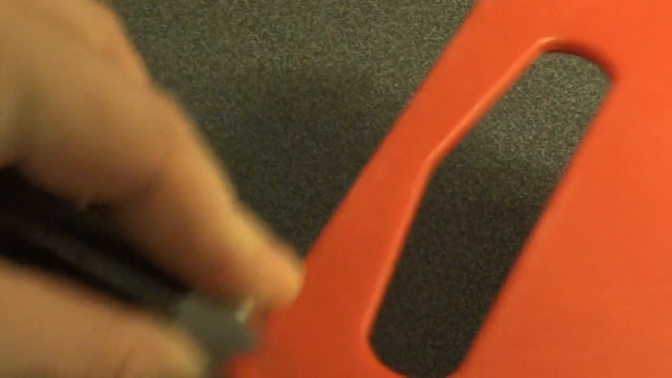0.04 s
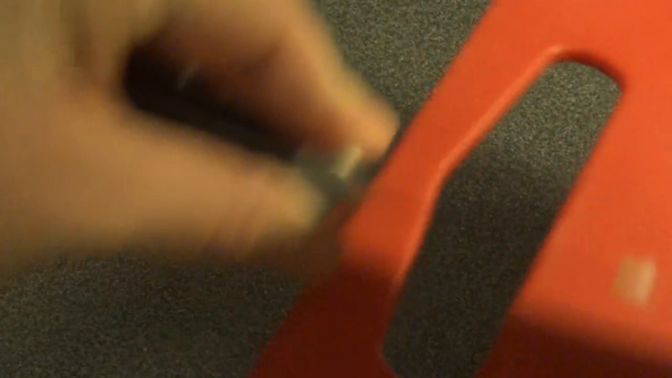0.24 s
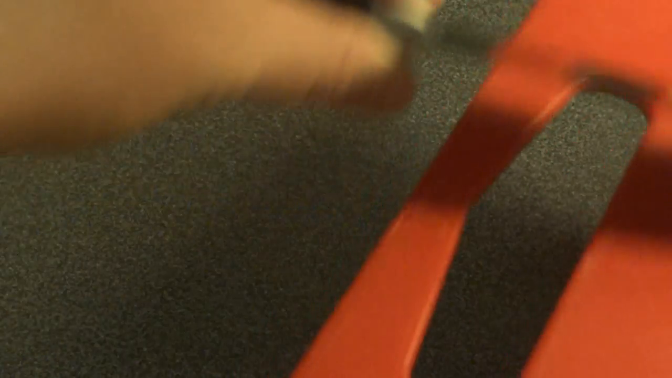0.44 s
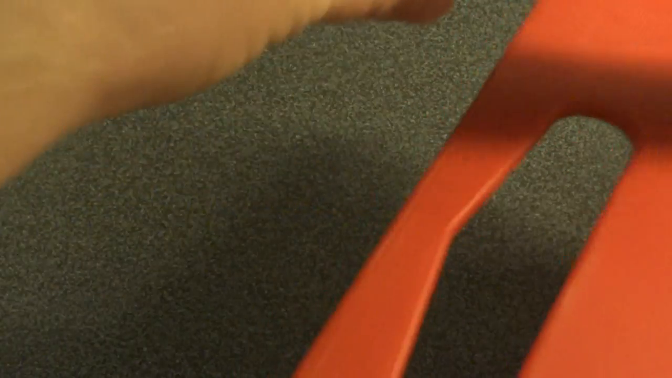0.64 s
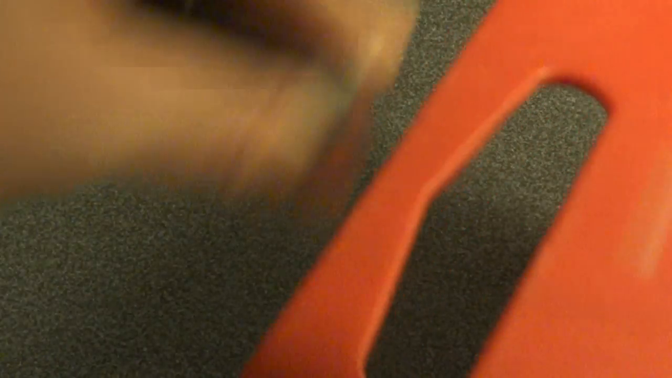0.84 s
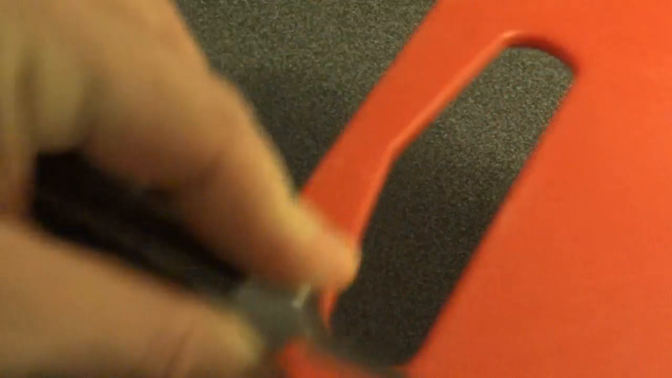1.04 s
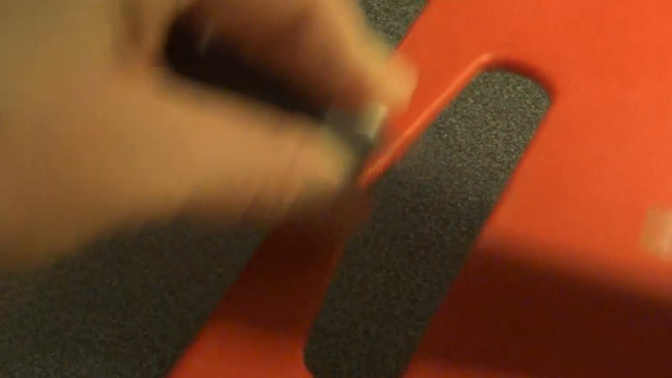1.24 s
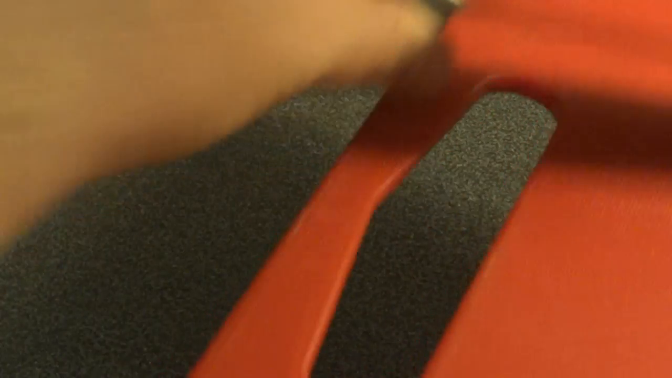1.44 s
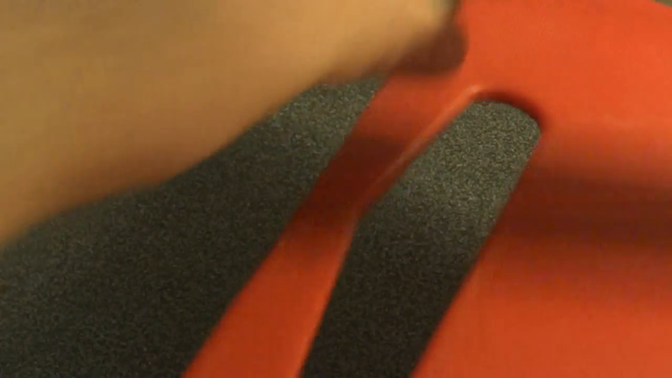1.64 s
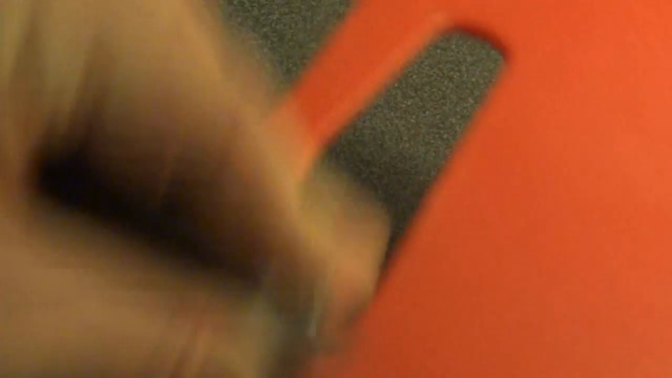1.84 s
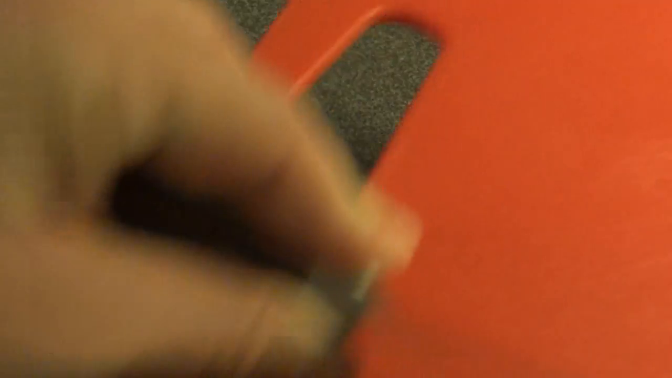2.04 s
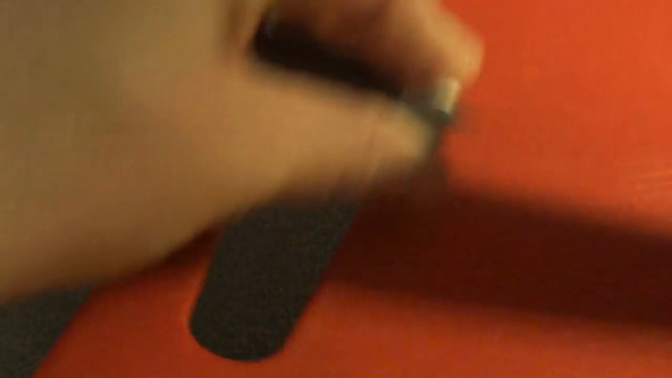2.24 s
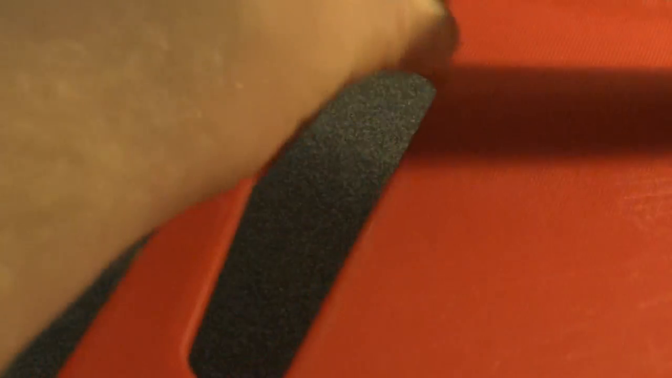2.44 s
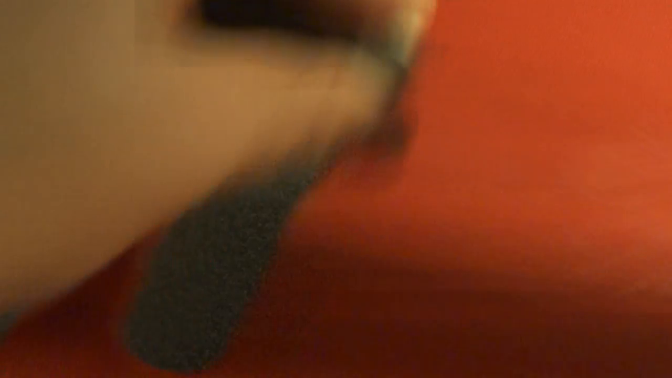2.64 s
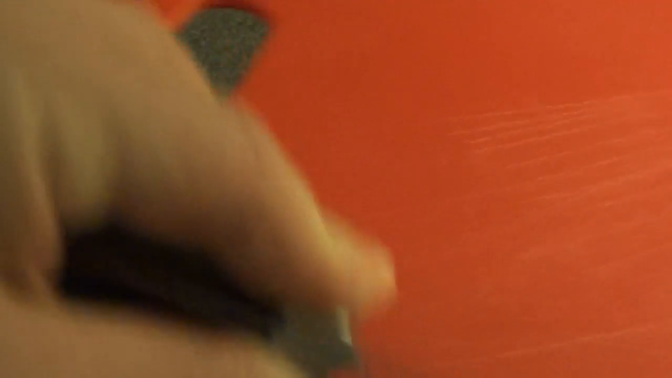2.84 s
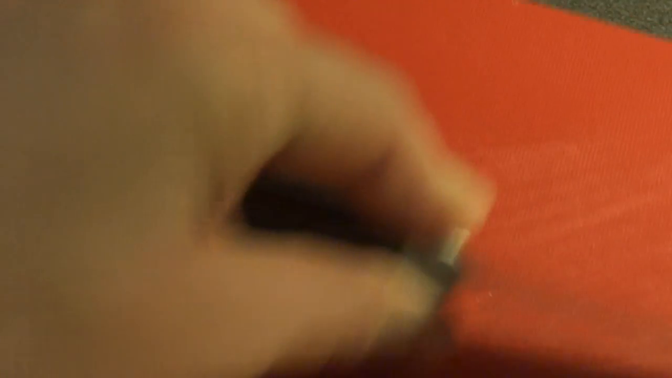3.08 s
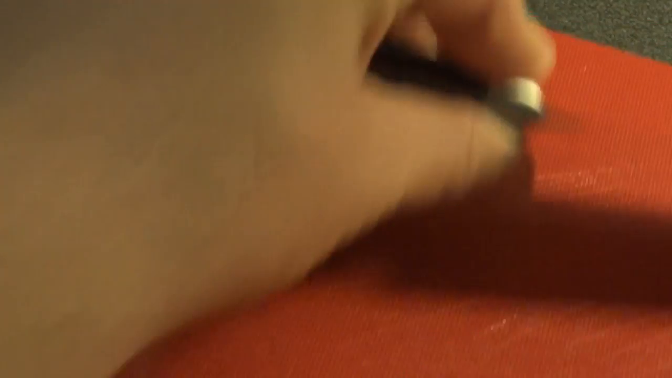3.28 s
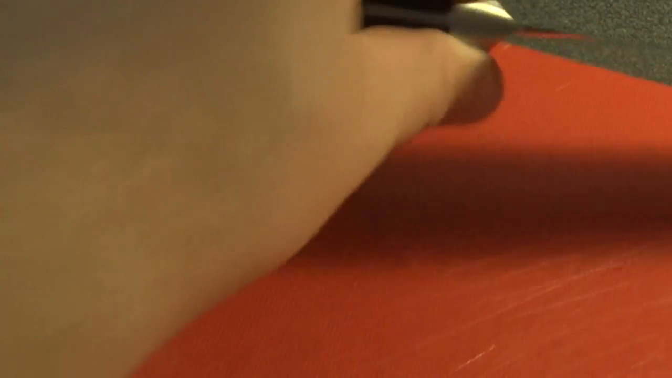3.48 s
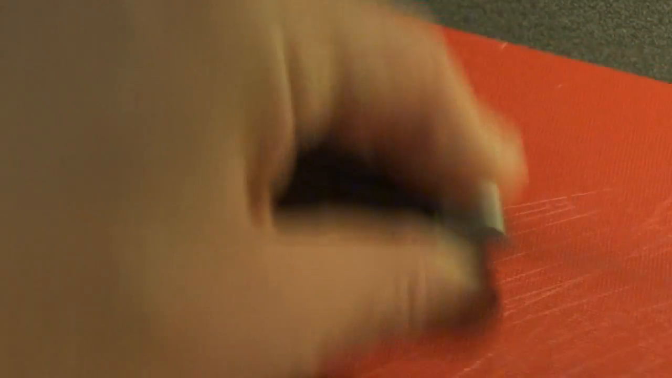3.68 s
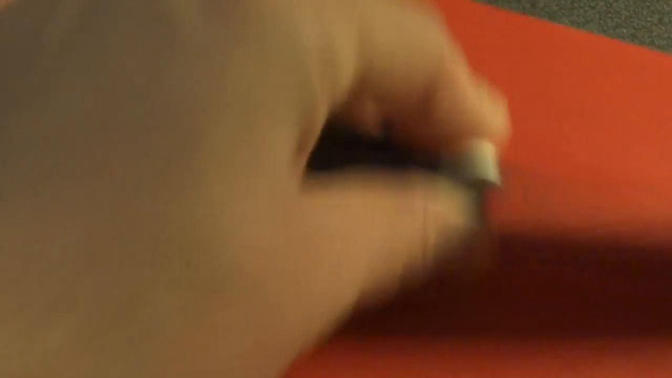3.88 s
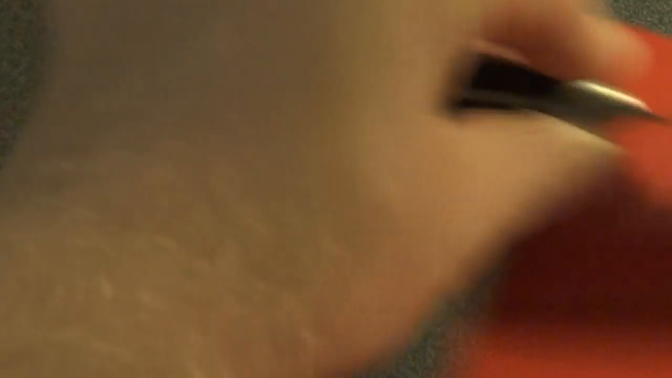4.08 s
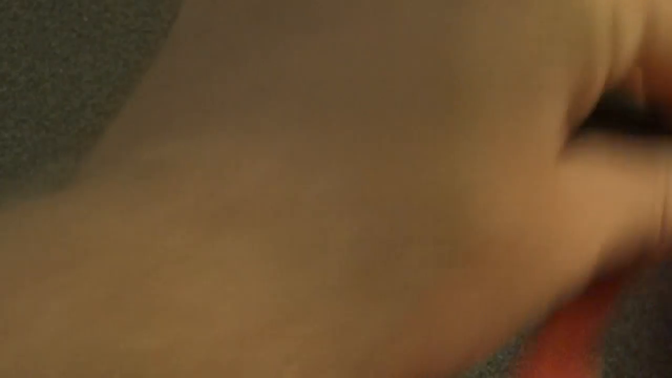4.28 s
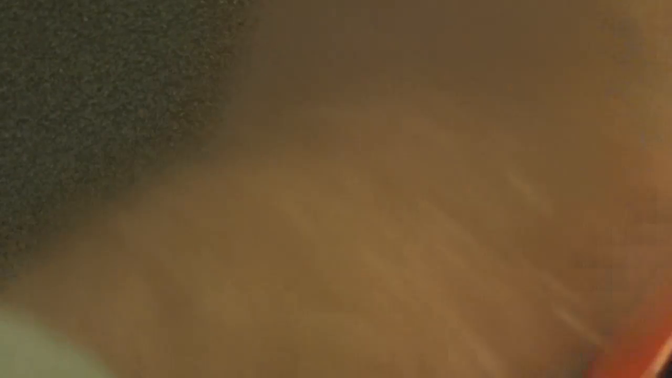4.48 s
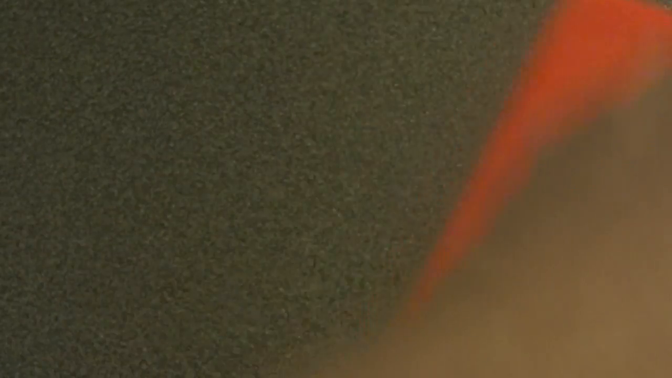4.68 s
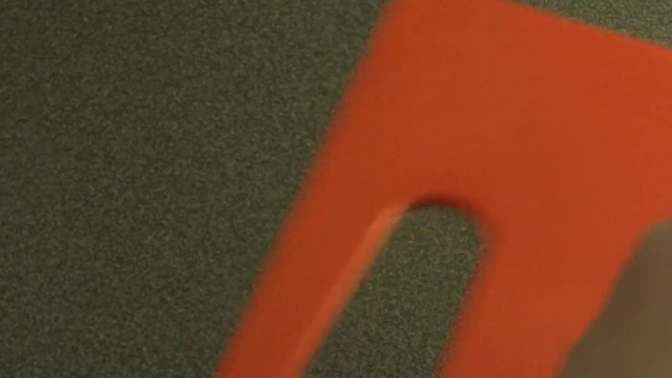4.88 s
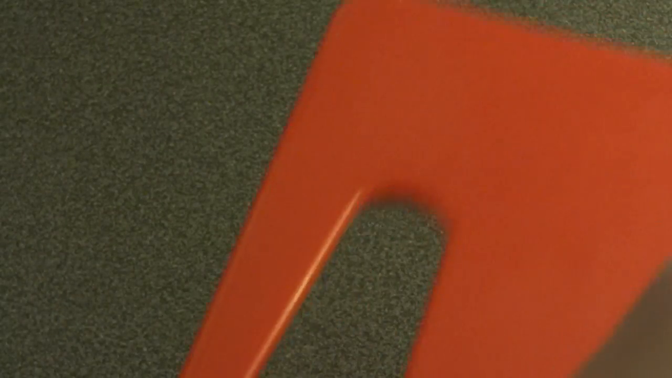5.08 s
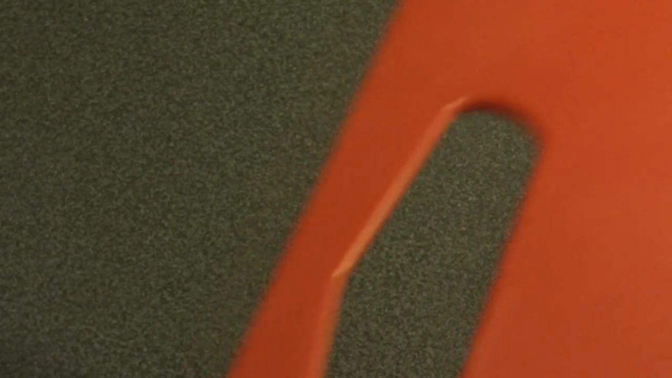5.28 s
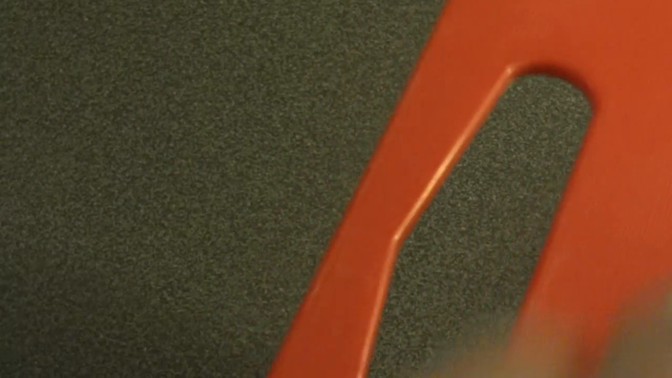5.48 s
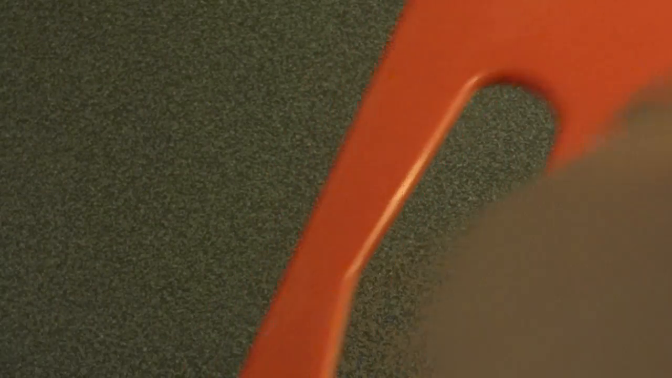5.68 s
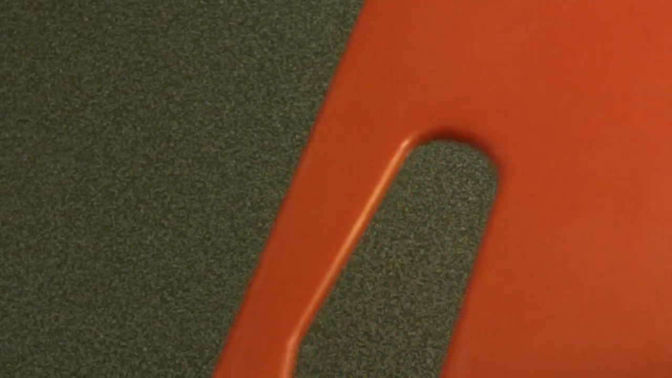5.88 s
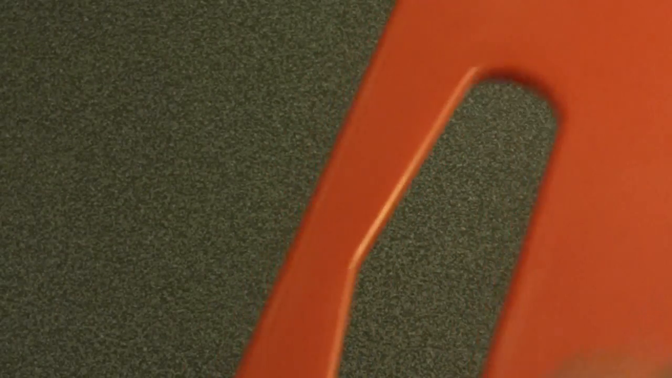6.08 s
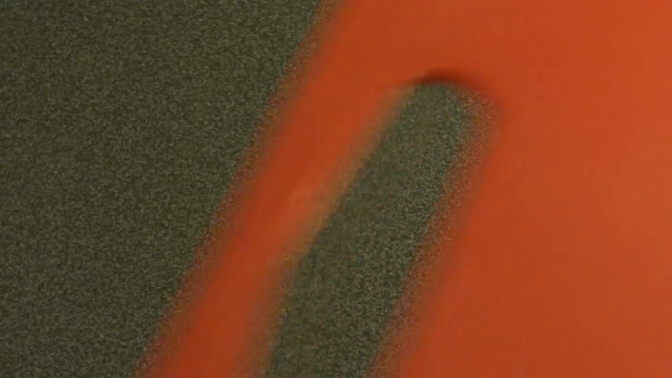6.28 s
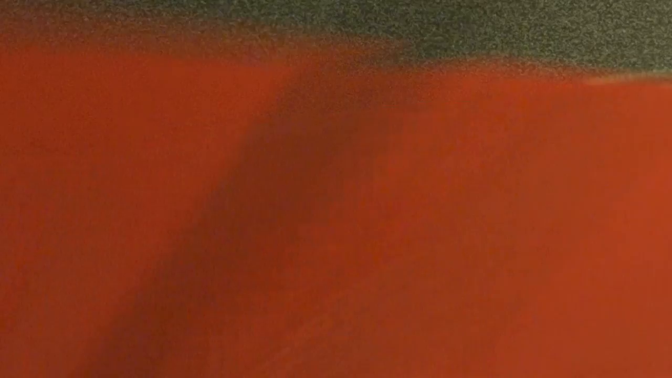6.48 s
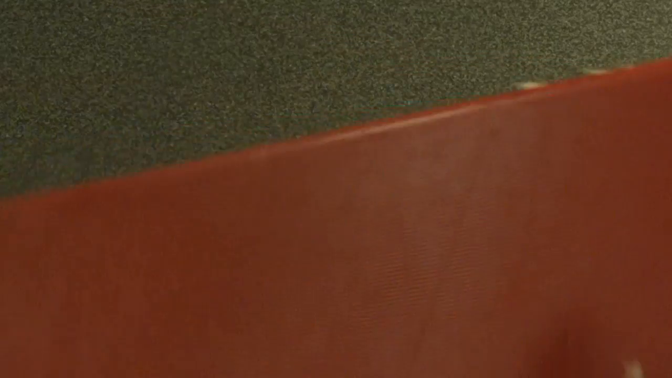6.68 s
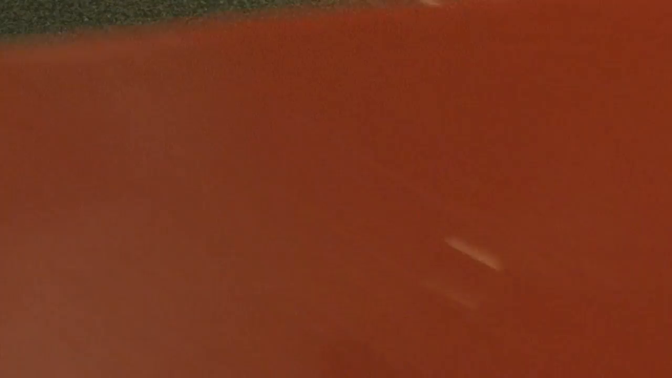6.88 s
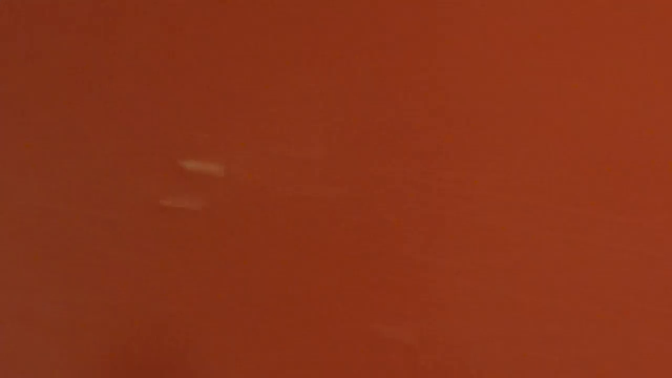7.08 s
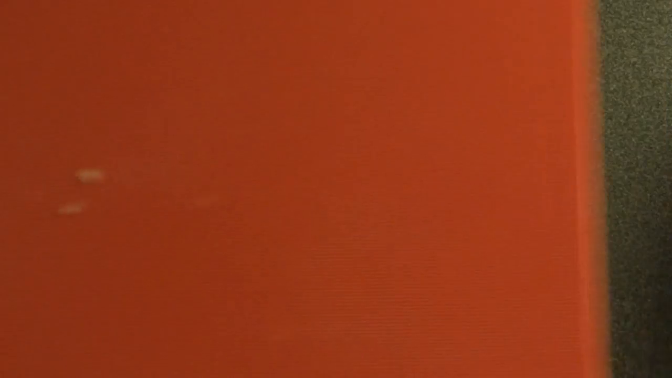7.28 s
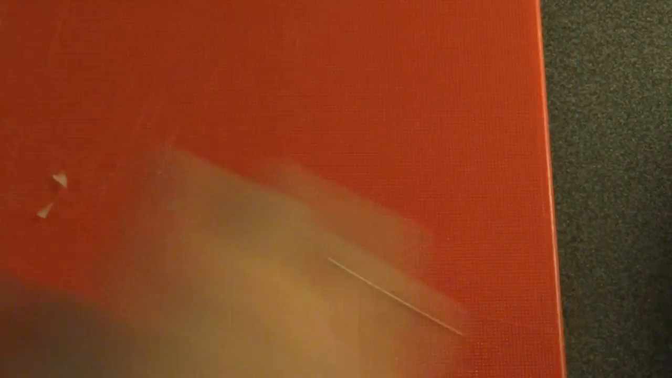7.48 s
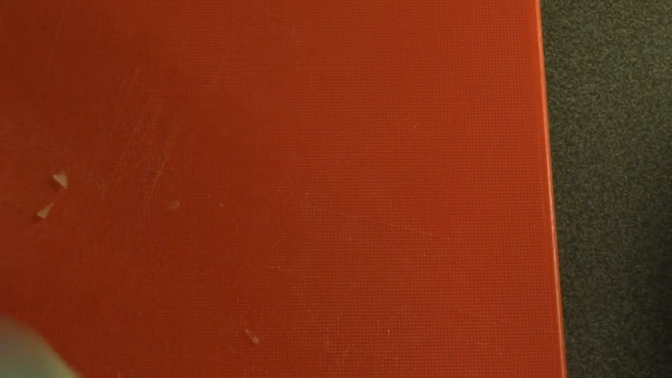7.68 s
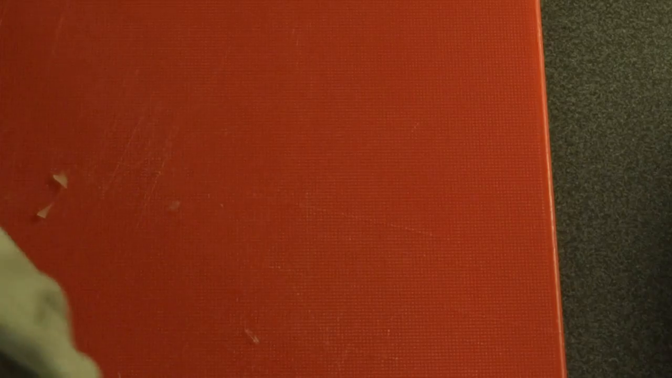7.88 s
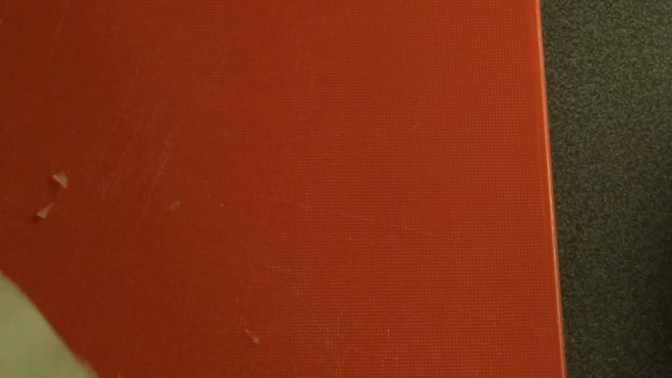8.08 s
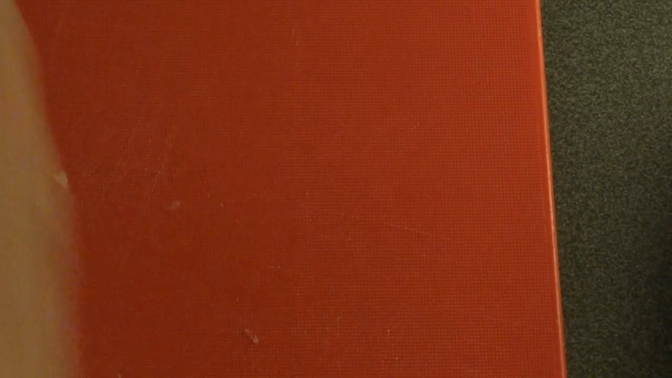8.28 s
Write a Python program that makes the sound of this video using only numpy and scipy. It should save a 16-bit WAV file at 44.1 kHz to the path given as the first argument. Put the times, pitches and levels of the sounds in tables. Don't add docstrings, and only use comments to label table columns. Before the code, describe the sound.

Close up in a hard-walled kitchen, a knife lands with a crack and rasps over a thin ridged plastic board about once a second, six times, the last two short. The blade is softly wiped, clinks and scrapes brightly on a steel rim, then the board slaps, slides and drops on the counter. A small stereo camera adds faint hiss.

```python
import sys
import numpy as np
from scipy import signal
from scipy.fft import rfft, irfft, next_fast_len
from scipy.io import wavfile
from scipy.ndimage import uniform_filter1d, map_coordinates

SR = 44100
rng = np.random.default_rng(int(sys.argv[2]) if len(sys.argv) > 2 else 0)


def convert_level_to_amplitude(level_db):
    exponent = np.asarray(level_db, float) / 20
    return 10 ** exponent


def master(y):
    cut = np.clip(np.atleast_2d(y).T, -1, 1)
    pcm = np.round(cut * 32767)
    wavfile.write(sys.argv[1], SR, pcm.astype(np.int16))


N = 367794


def unit(x):
    return x / np.sqrt(np.mean(x ** 2) + 1e-20)


def along(points, hz):
    f, v = np.transpose(points)
    return np.interp(np.log(hz + 1), np.log(f + 1), v)


def filtered(x, response):
    m = next_fast_len(x.shape[-1] + 8192)
    spectrum = rfft(x, m) * response(np.fft.rfftfreq(m, 1 / SR))
    return irfft(spectrum, m)[..., :x.shape[-1]]


def peak(f, hz, width):
    return 1j * f * width / (hz * hz - f * f + 1j * f * width + 1e-9)


def resonances(f, modes):
    return sum(convert_level_to_amplitude(db) * peak(f, hz, width) for hz, width, db in modes)


def causal(gain):
    m = 2 * len(gain) - 2
    cepstrum = irfft(np.log(gain + 1e-6), m)
    cepstrum[1:m // 2] *= 2
    cepstrum[m // 2 + 1:] = 0
    return np.exp(rfft(cepstrum))


def wobble(rate, part=slice(None)):
    knots = rng.standard_normal(int(N * rate / SR) + 4)
    return map_coordinates(knots, [np.arange(N)[part] * rate / SR], order=1)


def curves(tables, outside):
    out = np.full((len(tables[0][0]) - 1, N), float(outside))
    for s, *cols in map(np.transpose, tables):
        k = np.arange(int(s[0] * SR) + 1, min(int(s[-1] * SR) + 1, N))
        out[:, k] = np.maximum(out[:, k], [np.interp(k / SR, s, c) for c in cols])
    return out


def add(track, s, sound):
    part = track[..., round(s * SR):][..., :sound.shape[-1]]
    part += sound[..., :part.shape[-1]]


def add_hit(track, s, db, hit):
    add(track, s, convert_level_to_amplitude(db) * hit / np.abs(hit).max())


# (frequency [Hz], level [dB per Hz])
HISS_COLOUR = [(15, -53), (25, -30.5), (192, -9), (321, 0.5), (651, -4.5), (726, -1.5), (1430, -3),
               (1680, -6), (2270, -6.5), (2530, -7.5), (8140, -11.5), (15200, -13), (16500, -35.5)]
# (frequency [Hz], level [dB per Hz])
UNLIKE_COLOUR = [(15, -56), (25, -25.5), (259, -11.5), (349, -2), (746, -0.5), (952, -1), (1180, -1),
                 (11000, -23.5), (16500, -30)]
# (frequency [Hz], width [Hz], level [dB])
WHINE = [(4107, 14, -77), (8215, 70, -71), (10573, 30, -81), (12365, 110, -72)]
# (time [s], level [dB])
CREEP = [(0, -1), (4.3, -2), (5, -1.5), (6.5, 1), (8.34, .5)]


def floor():
    mid, side = (unit(filtered(rng.standard_normal(N), lambda f: convert_level_to_amplitude(along(colour, f))))
                 for colour in (HISS_COLOUR, UNLIKE_COLOUR))
    drift, flicker_db = np.cumsum(wobble(40)) / SR, 2.5 * wobble(60)
    whine = np.zeros(N)
    for hz, width, db in WHINE:
        turns = hz * np.arange(N) / SR + width / 2 * drift
        whine += convert_level_to_amplitude(db + 3 + flicker_db) * np.sin(2 * np.pi * turns)
    creep_db, = curves([CREEP], -9)
    return convert_level_to_amplitude(-59 + creep_db) * (mid + convert_level_to_amplitude(-2.0) * np.outer([1, -1], side)) + whine


def burst(t60):
    t = np.arange(SR // 8) / SR
    decay = convert_level_to_amplitude(-60 * t / max(t60, .003)) + 1.9 * convert_level_to_amplitude(-60 * t / min(0.03, 3 * t60))
    chatter = rng.standard_normal(len(t)) * decay
    chatter[0] = 12
    return chatter


# (frequency [Hz], level [dB per Hz])
KNOCK = [(60, -45), (150, -16), (500, -5), (1400, -1), (3000, -3), (4400, -4), (5500, -9), (7000, -17),
         (14000, -24), (16500, -40)]


def thuds(blows, modes=()):
    out = np.zeros(N)
    for s, db, centre_hz, thud_db, t60 in blows:
        def plate(f):
            thud = causal(convert_level_to_amplitude(along(KNOCK, f) + thud_db)) * (1 + 3 * peak(f, 440, 270))
            crack = peak(f, centre_hz, 2.2 * centre_hz) ** 2 + 0.17 * peak(f, 7100, 12000)
            return (thud + crack) * (1 + resonances(f, modes))
        add_hit(out, s, db, filtered(burst(t60), plate))
    return out


# (time [s], peak level [dB], thud level [dB])
LANDINGS = [
    (0.013, -10.5, -0.5),
    (1.0282, -11, 7),
    (1.926, -9, 29),
    (2.9073, -11, -4.5),
    (3.8014, -13, -7),
    (4.2605, -9.5, 22),
    (1.9287, -13.5, 2.5),
    (2.911, -15.5, 0),
]
# (frequency [Hz], width [Hz], level [dB])
LANDED = [(598, 150, 5), (950, 130, 2), (1380, 140, 4), (2540, 200, 2), (3100, 200, -3), (4420, 350, -3)]


def landings():
    edge_hz, edge_t60 = 850, 0.035
    return thuds([(s, db, edge_hz, thud_db, edge_t60) for s, db, thud_db in LANDINGS], LANDED)


def pressed(tables, grips, by_end_db=(0, 0), midway_db=(0, 0)):
    out = []
    for rows, (low_db, high_db, *motion) in zip(tables, grips):
        knots, db = np.transpose(rows)
        s = np.union1d(knots, np.linspace(knots[0], knots[-1], num=24))
        db = np.interp(s, knots, db)
        progress = (s - s[0]) / (s[-1] - s[0])
        fastest, slow_hz, fast_hz = motion or (.5, 0, 0)
        speed = np.sin(np.pi * progress ** (np.log(.5) / np.log(fastest)))
        low, high = np.outer(by_end_db, progress) + np.outer(midway_db, speed)
        ridge_hz = slow_hz + (fast_hz - slow_hz) * speed
        out.append(np.transpose([s, db + low_db + low, db, db + high_db + high, ridge_hz]))
    return out


def friction(tables, colour, modes, slips, scatter_db, judder_db, patchy_db, ridge_db=0):
    busy = slice(round(tables[0][0][0] * SR), round(tables[-1][-1][0] * SR) + SR // 2)
    control = curves(tables, -150)[:, busy]
    force = ((rng.random(N) < slips / SR) * rng.standard_normal(N))[busy]
    force *= convert_level_to_amplitude(scatter_db * wobble(300, busy))
    hz, t, z = signal.stft(force, SR, nperseg=512)
    clumps = uniform_filter1d(rng.standard_normal((257, N // 250)), size=8, axis=0)
    clumps = uniform_filter1d(clumps, size=4, axis=1)
    ridge_hz = np.interp(t, np.arange(len(force)) / SR, np.maximum(control[-1], 300))
    octaves = np.log2((hz[:, None] + 1) / ridge_hz)
    gain = convert_level_to_amplitude(patchy_db * unit(clumps)[:, :len(t)] + ridge_db * np.exp(-(octaves / .25) ** 2))
    force = signal.istft(z * gain, SR, nperseg=512)[1][:len(force)]

    def split(f):
        low = 1 / (1 + (f / 1200) ** 6)
        high = 1 - 1 / (1 + (f / 5000) ** 6)
        return convert_level_to_amplitude(along(colour, f)) * np.array([low, 1 - low - high, high])

    def body(f):
        return 1 + resonances(f, modes)

    bands = filtered(force, split)
    bands /= filtered(bands, body).std(axis=1, keepdims=True)
    judder = judder_db * np.array([wobble(45, busy) for _ in bands])
    out = np.zeros(N)
    out[busy] = filtered((convert_level_to_amplitude(control[:3] + judder) * bands).sum(axis=0), body)
    return out


# (time [s], pressure [dB])
STROKES = [
    [(.024, -38.5), (.14, -35), (.175, -27.5), (.346, -32.5), (.424, -30.5), (.554, -32), (.66, -61)],
    [(1.037, -32), (1.045, -44), (1.095, -36), (1.15, -28), (1.375, -32.5), (1.479, -35.5), (1.503, -51),
     (1.58, -62)],
    [(1.936, -38), (1.98, -35.5), (2.156, -27.5), (2.25, -28.5), (2.336, -30), (2.356, -33), (2.42, -31),
     (2.5, -66)],
    [(2.917, -30), (2.949, -43), (3.0, -31), (3.091, -28), (3.225, -27), (3.329, -31.5), (3.38, -37),
     (3.48, -69)],
    [(3.81, -31.5), (3.836, -37.5), (3.858, -29), (3.948, -34), (4.08, -57.5)],
    [(4.269, -35), (4.289, -34.5), (4.351, -33), (4.48, -75)],
]
# (board body [dB], edge hiss over the rasp [dB], share of the stroke at full speed,
# slow ridge rate [Hz], fast ridge rate [Hz])
GRIPS = [(3.5, -16, 0.34, 490, 560), (1, -13.5, 0.37, 420, 580), (0, -14.5, 0.56, 250, 690),
         (2.5, -17, 0.56, 460, 720), (-2, -12, 0.093, 370, 720), (-2.5, -10, 0.16, 1000, 720)]
# (gain as the edge rolls up [dB], gain at full speed [dB])
ROLL = [(-5, 6), (10.5, -1)]
# (frequency [Hz], level [dB per Hz])
RASP_COLOUR = [(18, -89), (30, -56), (242, -16.5), (298, -10), (378, -11), (420, -5.5), (493, -7),
               (533, -8.5), (713, -4), (1750, -19), (1890, -20.5), (5300, -26), (13700, -27.5),
               (15200, -32.5), (16500, -73)]
# (frequency [Hz], width [Hz], level over the smooth colour [dB])
BOARD = [(319, 22, 9), (418, 26, 12), (460, 18, 10), (527, 18, 13), (553, 20, 10), (631, 30, 8),
         (721, 28, 9), (752, 22, 8), (825, 20, 7), (940, 24, 7), (1005, 26, 5), (1240, 40, 3),
         (1474, 22, 6), (1900, 70, 0), (2540, 90, -3), (3080, 200, -9)]


def rasps():
    return friction(pressed(STROKES, GRIPS, *np.transpose(ROLL)), RASP_COLOUR, BOARD,
                    slips=5500, scatter_db=2.2, judder_db=1, patchy_db=2.3, ridge_db=4)


def rings(rows, shape, rough):
    out, t = np.zeros(N), np.arange(-SR // 6, SR // 4) / SR
    for s, hz, db, swell, fade in rows:
        shake = [np.interp((t - t[0]) * 120, np.arange(60), knots) for knots in rng.standard_normal((2, 60))]
        level_db = db + 3 - 7 * np.where(t < 0, -t / swell, t / fade) ** shape + 6 * rough * shake[0]
        add(out, s + t[0], convert_level_to_amplitude(level_db) * np.sin(2 * np.pi * hz * (s + t) + rough * shake[1]))
    return out


# (time [s], frequency [Hz], rms
# level [dB], swell [s], fade [s])
SURGES = [(0.175, 419.7, -22.5, 0.017, 0.023), (0.192, 542, -27.5, 0.014, 0.068),
          (0.222, 727, -33, 0.017, 0.042), (0.232, 627, -17.5, 0.017, 0.022),
          (0.234, 942, -23, 0.012, 0.034), (0.237, 786, -27.5, 0.019, 0.021),
          (0.307, 412, -20.5, 0.017, 0.033), (0.424, 1003, -31.5, 0.09, 0.039),
          (0.429, 734, -38, 0.039, 0.047), (1.048, 419, -30, 0.019, 0.024),
          (1.135, 700, -29.5, 0.012, 0.0097), (1.182, 876, -36, 0.017, 0.022),
          (1.195, 561.5, -17.5, 0.017, 0.019), (1.21, 701, -29, 0.019, 0.09),
          (1.267, 1018, -30.5, 0.014, 0.017), (1.287, 529.6, -31, 0.014, 0.057),
          (1.302, 700, -29, 0.049, 0.017), (1.394, 652, -36, 0.09, 0.012),
          (2.227, 534.8, -15.5, 0.054, 0.046), (2.242, 830, -33.5, 0.09, 0.07),
          (2.255, 736, -24, 0.019, 0.014), (2.332, 732, -26, 0.017, 0.027),
          (2.407, 424.8, -21.5, 0.019, 0.014), (3.001, 626, -25, 0.022, 0.027),
          (3.066, 429, -25, 0.057, 0.09), (3.103, 611, -23, 0.014, 0.032), (3.138, 897, -26, 0.019, 0.021),
          (3.163, 425.8, -24, 0.019, 0.044), (3.165, 519, -31, 0.029, 0.09),
          (3.17, 685.4, -20.5, 0.037, 0.051), (3.198, 615, -22, 0.019, 0.022),
          (3.22, 917, -22.5, 0.039, 0.047), (3.265, 537, -22, 0.012, 0.016),
          (3.288, 990, -31.5, 0.09, 0.016), (3.861, 964, -30.5, 0.037, 0.017),
          (3.866, 686, -21.5, 0.014, 0.011), (3.884, 574, -29, 0.014, 0.044),
          (4.318, 729, -36, 0.052, 0.017),
          (.24, 1474, -36, .03, .03), (1.155, 585, -26, .045, .025), (2.11, 505, -28, .05, .03),
          (2.19, 735, -25, .04, .02), (2.2, 1007, -32, .03, .07), (2.26, 1250, -31, .03, .05),
          (3.215, 1244, -31, .06, .08), (3.24, 1324, -33, .02, .07), (3.27, 1640, -35, .05, .05),
          (3.24, 1071, -30, .03, .02)]


def surges():
    touching = curves(STROKES, -150)[0] > -150
    return rings(SURGES, shape=1.5, rough=.28) * touching


def spots(contacts):
    out = np.zeros(N)
    for s, db, centre_hz, width_hz, t60 in contacts:
        add_hit(out, s, db, filtered(burst(t60), lambda f: peak(f, centre_hz, width_hz) ** 2))
    return out


# (time [s], peak level [dB], centre [Hz], width [Hz], t60 [s])
TICKS = [(4.5659, -34, 2080, 2320, 0.47), (4.9701, -6.5, 8100, 14200, 0.007), (4.7, -41, 12000, 6980, .05),
         (6.243, -45, 1000, 700, .02), (6.793, -11.5, 3390, 6900, 0.0035),
         (7.378, -5.5, 4060, 5000, 0.0033), (7.378, -11.5, 1780, 1500, 0.0067),
         (.196, -31, 3970, 4960, .004), (.623, -29, 11000, 8000, .004), (.646, -29, 13500, 5000, .004),
         (1.344, -16, 3970, 5000, .004), (1.654, -48, 2000, 1490, .02), (2.645, -47, 2000, 3000, 0.022),
         (3.2046, -32, 6000, 7040, .004), (5.868, -15, 4270, 4000, .02), (6.588, -43, 4040, 3980, .004),
         (6.9792, -38, 9000, 9000, .004), (7.0435, -38, 9000, 10000, .004),
         (7.0889, -29, 12500, 5000, .004), (7.1084, -23, 12700, 4940, .02), (6.166, -36, 1170, 2470, 0.76),
         (7.09, -34, 3900, 500, .04), (7.706, -26, 6450, 2930, 0.011), (7.709, -38, 6700, 3080, 0.27),
         (7.705, -48, 10930, 2000, 0.022), (7.777, -27, 3900, 800, 0.008),
         (7.777, -28.5, 12470, 4060, 0.012), (7.778, -36, 930, 907, 0.028),
         (8.14, -40.5, 12000, 4000, 0.01), (8.294, -42, 1300, 600, .03), (8.294, -44, 3300, 1800, .01),
         (8.294, -47, 350, 300, .04), (8.318, -47, 1400, 700, .06)]


def ticks():
    return spots(TICKS)


# (time [s], frequency [Hz], rms level [dB],
# swell [s], fade [s])
SINGS = [(.76, 1474, -66, .03, .02), (.85, 1474, -60, .06, .025), (1.712, 1474, -50, .035, .06),
         (2.414, 1474, -42, .01, .025), (2.5, 1476, -45.5, .05, .06), (2.6, 1476, -48.5, .035, .04),
         (2.69, 1476, -63, .05, .06), (2.414, 3460, -49, .008, .03), (2.49, 3460, -53, .05, .05),
         (2.56, 3460, -60, .04, .025), (4.735, 9510, -57, .025, .025), (4.72, 11300, -54, .012, .012),
         (4.72, 14000, -56, .015, .015), (4.739, 12500, -53, .005, .01), (2.46, 422, -37, .03, .04),
         (3.39, 1474, -43, .02, .025), (3.4, 528, -38, .06, .07), (5.873, 3460, -29, .003, .018),
         (5.946, 3460, -27, .022, .018), (5.995, 3460, -42, .015, .012), (6.05, 3460, -44, .015, .035),
         (5.874, 5985, -32, .003, .015), (6.09, 5985, -47, .02, .03), (5.88, 1474, -38, .004, .02),
         (5.95, 422, -41, .03, .04)]


def singing():
    return rings(SINGS, shape=1.4, rough=.15)


# (time [s], peak level [dB], centre [Hz], length [s])
BUMPS = [
    (1.55, -64, 110, 0.038),
    (7.129, -56, 100, 0.042),
    (7.369, -31.5, 242, 0.021),
]


def bumps():
    out, t = np.zeros(N), np.arange(SR // 2) / SR
    for s, db, centre_hz, length in BUMPS:
        puff = unit(filtered(rng.standard_normal(len(t)), lambda f: peak(f, centre_hz, 1.2 * centre_hz) ** 2))
        add(out, s, convert_level_to_amplitude(db) * puff * t / length * np.exp(1 - t / length))
    return out


# (time [s], pressure [dB])
WIPES = [
    [(4.698, -63), (4.724, -55.5), (4.742, -59), (4.754, -72)],
    [(4.77, -84), (4.848, -83), (4.92, -96)],
    [(4.978, -36.5), (5.072, -54.5), (5.2, -68.5)],
    [(5.17, -71.5), (5.306, -59.5), (5.322, -49)],
    [(6.125, -75), (6.15, -63), (6.16, -72), (6.183, -52)],
]
# (low band over the middle [dB], high band over the middle [dB])
WIPE_GRIPS = [(-14, 4.5), (-17, 23), (-4.5, 0), (-13, 16), (1, 22)]
# (frequency [Hz], level [dB per Hz])
WIPE_COLOUR = [(59, -73), (100, -51), (418, -10), (983, -8.5), (5670, -9), (13000, -8.5), (15500, -12),
               (16500, -36)]
# (frequency [Hz], width [Hz], level [dB])
GRIPPED = [(441, 18, 13), (5930, 160, 2), (7700, 50, -8), (10640, 280, 3), (13000, 120, 7)]


def wipes():
    return friction(pressed(WIPES, WIPE_GRIPS), WIPE_COLOUR, GRIPPED,
                    slips=2500, scatter_db=0.0, judder_db=-2.0, patchy_db=-1.5)


def steel_blows(blows, modes, grind, swell):
    out, t = np.zeros(N), np.arange(SR // 2) / SR
    for s, db, slope_db, contact, damping in blows:
        push = np.exp(-np.abs(t / contact - 1.1) ** 3)
        ring = np.zeros(len(t))
        for hz, level, t60 in modes:
            level_db = level + slope_db * np.log2(hz / 6000) - 60 * damping * t / t60
            phase = 2 * np.pi * (hz * t + rng.random())
            shake = np.cumsum(rng.normal(0, .06, len(t)))
            ring += convert_level_to_amplitude(level_db) * np.sin(phase + shake)
        scratch = unit(filtered(rng.standard_normal(len(t)), lambda f: (
            peak(f, 10800, 5400) + 0.64 * peak(f, 4800, 5000) + 0.52 * peak(f, 1760, 1500))))
        hit = ring * (1 - np.exp(-t / contact) + swell * push) + grind * push ** 2 * scratch
        hit = filtered(hit, lambda f: (1j * f / (1j * f + 300)) ** 3)
        add_hit(out, s, db, hit)
    return out


# (time [s], peak level [dB], brightness [dB per octave], contact [s], damping of the grip)
GRAZES = [
    (4.736, -42, 0, .002, 1.2),
    (5.543, -34, 3, .005, 1.2),
    (6.185, -15, -1, .001, .7),
]
# (frequency [Hz], level [dB], t60 [s])
TIP = [(4683, -27, 0.03), (6191, -29, 0.11), (6961, -10, 0.06), (7827, -17, 0.041), (8710, -8, 0.042),
       (9512, -23, 0.094), (10450, -26, 0.12), (11250, -21, 0.065), (11430, -9, 0.045), (12270, -3, 0.041),
       (13310, -16, 0.062), (15160, -20, 0.075)]


def grazes():
    return steel_blows(GRAZES, TIP, grind=.3, swell=1)


# (time [s], peak level [dB], brightness [dB per octave], contact [s], damping of the grip)
CLINKS = [
    (5.3205, -7.5, -.4, .0115, 1.05),
]
# (frequency [Hz], level [dB], t60 [s])
STEEL = [(650, -19, .25), (1001, -22, .3), (1250, -15, .2), (1475, -17, .45), (1599, -10, .2),
         (2116, -12, .35), (2606, -15, .33), (3128, -20, .35), (3671, -12, .33), (4339, -18, .3),
         (5103, -11, .45), (5550, -11, .3), (6126, -8, .18), (7101, -11, .29), (7854, -10, .24),
         (7946, -9, .23), (8533, -16, .3), (9485, -5, .29), (10240, -12, .3), (10430, -10, .24),
         (11110, -8, .2), (11330, -4, .24), (12410, -8, .25), (12700, -6, .23), (13330, -2, .13),
         (14060, -6, .21), (14210, -4, .33), (15190, -12, .25)]


def clink():
    return steel_blows(CLINKS, STEEL, grind=2.6, swell=4.5)


# (time [s], peak level [dB])
CHATTER = [
    (5.8672, -3),
    (5.8712, -6),
    (5.8783, -5.5),
    (5.8937, -4),
    (5.8986, -7.5),
    (5.91, -9),
    (5.9118, -9.5),
]
# (centre [Hz], width [Hz], t60 [s])
SKIP = (11400, 8000, 0.0025)


def chatter():
    rebound_db = 1.2
    return spots([(s, db + rebound_db, *SKIP) for s, db in CHATTER])


# (time [s], pressure [dB])
DRAWS = [
    [(5.869, -35), (5.893, -39), (5.962, -38), (5.981, -47.5), (6.125, -61)],
]
# (low band over the middle [dB], high band over the middle [dB])
DRAW_GRIPS = [(1.2, 10.5)]
# (low band [dB], high band [dB])
PULL = [(3, -1), (3, 0)]
# (frequency [Hz], level [dB per Hz])
DRAW_COLOUR = [(59, -59), (100, -25.5), (345, -20.5), (418, -16.5), (2630, -1), (3470, 2), (3780, -2),
               (15100, -12), (16500, -41)]
# (frequency [Hz], width [Hz], level over the smooth colour [dB])
HELD = [(425, 30, 6), (1475, 40, 3), (3458, 30, 2), (5071, 35, 6), (5416, 40, 5), (5609, 50, 6),
        (5985, 30, 10), (6966, 40, 5), (7800, 60, 4), (8550, 50, 4), (9510, 35, 10), (11400, 70, 4),
        (13340, 70, 5), (14240, 60, 4)]


def draw():
    return friction(pressed(DRAWS, DRAW_GRIPS, *PULL), DRAW_COLOUR, HELD,
                    slips=16000, scatter_db=0.0, judder_db=2.0, patchy_db=-0.5)


# (time [s], peak level [dB], centre [Hz], thud level [dB], t60 [s])
TAPS = [
    (4.97, -17.5, 5700, 19, 0.067),
    (6.719, -13.5, 2720, 2, 0.13),
    (6.7213, -8.5, 2720, -2, .05),
    (6.723, -11.5, 1890, -13, 0.069),
    (6.792, -18.5, 2790, 14, 0.17),
    (7.369, -21, 1237, 6, 0.1),
    (7.3763, -16.5, 1568, 2, 0.079),
]


def drops():
    return thuds(TAPS)


# (time [s], pressure [dB])
DRAGS = [
    [(6.732, -27.5), (6.785, -37), (6.796, -32.5), (6.92, -44.5)],
    [(6.92, -42), (6.98, -39), (7.1, -39.5), (7.214, -50), (7.262, -49), (7.362, -48.5)],
    [(7.386, -31), (7.398, -38), (7.584, -69), (7.66, -73.5)],
    [(7.8, -59.5), (7.99, -56.5), (8.114, -63.5), (8.25, -70.5)],
]
# (low band over the middle [dB], high band over the middle [dB])
DRAG_GRIPS = [(-4, -2.5), (2.5, -11.5), (-3.5, 4), (-13, -0.5)]
# (low band [dB], high band [dB])
SLAP = [(3, -7.5), (0.5, -5)]
SHOVE = [(-9.5, 13), (2.5, 1.5)]
SLIDE = [(-6, 7.5), (5, -4)]
# (frequency [Hz], level [dB per Hz])
DRAG_COLOUR = [(24, -71), (40, -27), (115, -15.5), (341, -7), (367, 7.5), (427, 1.5), (844, 2.5),
               (1290, -0.5), (1670, 1), (2490, 0), (14900, -16), (16500, -43)]
# (frequency [Hz], width [Hz], level [dB])
SHEET = [(226, 17, -1), (334, 22, 7.5), (700, 60, 1.5), (1750, 260, -5.5), (3900, 290, -14)]


def drags():
    tables = []
    for rows, grip, motion in zip(DRAGS, DRAG_GRIPS, (SLAP, SHOVE, SLIDE, SLIDE)):
        tables += pressed([rows], [grip], *motion)
    return friction(tables, DRAG_COLOUR, SHEET, slips=12000, scatter_db=-1.0, judder_db=1.0, patchy_db=1.0)


# (frequency [Hz], t60 [s])
KITCHEN = [(150, 0.6), (600, 0.41), (3000, 0.45), (12000, 0.31)]


def kitchen(x):
    out, step = np.zeros((2, N)), SR // 3
    for k in range(0, N, step):
        hz, t, z = signal.stft(rng.standard_normal((2, SR // 2)), SR, nperseg=256)
        decay = convert_level_to_amplitude(-60 * t / along(KITCHEN, hz)[:, None])
        mid, side = signal.istft(z * decay, SR, nperseg=256)[1]
        tail = np.array(mid + 0.19 * np.outer([1, -1], side)) / np.linalg.norm(mid)
        add(out, k / SR + .006, signal.fftconvolve(x[None, k:k + step], tail, axes=1))
    return out


# (delay [s], level [dB])
ECHOES = [
    (.0011, -29),
    (.0027, -17),
    (.0046, -22),
]


def ports(x, lead, pan_db):
    def near(f):
        return sum(convert_level_to_amplitude(db) * np.exp(-2j * np.pi * f * s) for s, db in ECHOES) * peak(f, 3000, 5500)

    def pair(f):
        return np.exp(.5j * np.outer([1, -1], along(lead, f))) + np.outer([1, -1], near(f))

    return convert_level_to_amplitude([[pan_db / 2], [-pan_db / 2]]) * filtered(x, pair)


# (frequency [Hz], phase [radians])
LEAD_KNIFE = [(0, 0), (690, -0.37), (5000, -0.048), (16500, 0.18)]
LEAD_BOARD = [(0, 0.089), (690, -0.31), (1460, -0.34), (16500, -0.12)]


def scene():
    dry = landings() + rasps() + ticks() + bumps() + wipes() + grazes() + clink()
    dry += chatter() + draw() + drops() + drags()
    late = np.arange(N) > 6.6 * SR
    knife = (dry + singing() + surges()) * ~late
    close = ports(knife, LEAD_KNIFE, -.55) + ports(dry * late, LEAD_BOARD, .25)
    return close + convert_level_to_amplitude(-6.5) * kitchen(dry) + floor()


def roll_off(x):
    return signal.sosfilt(signal.butter(12, 16990, fs=SR, output="sos"), x)


def record(dry):
    rounded = dry / (1 + np.abs(dry / .7) ** 4) ** .25
    mix = filtered(rounded, lambda f: (1j * f / (1j * f + 90)) ** 2 / (1 + (f / 15900) ** 90))
    return roll_off(mix)


dry = scene()
out = record(dry)
master(out)
```